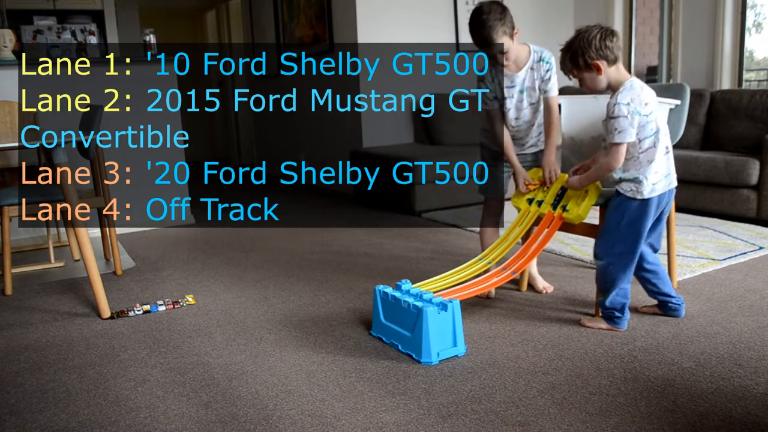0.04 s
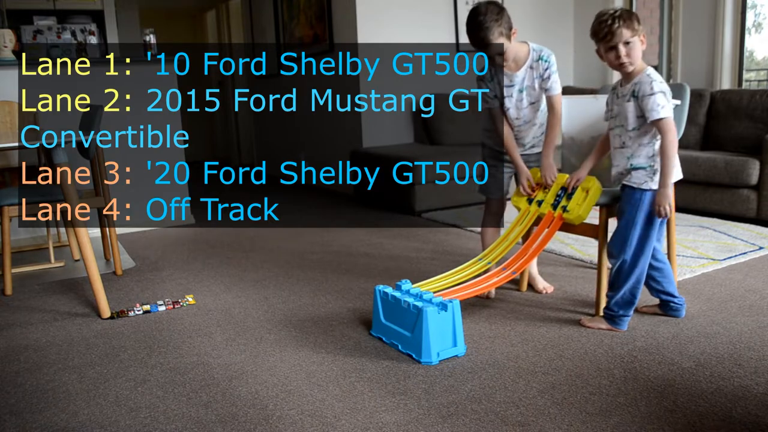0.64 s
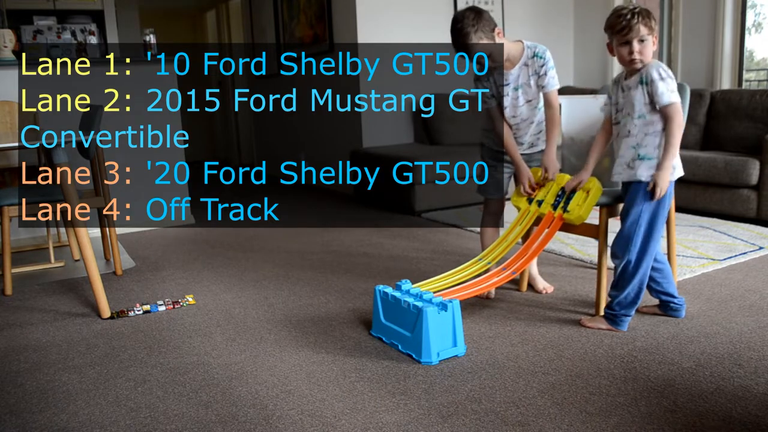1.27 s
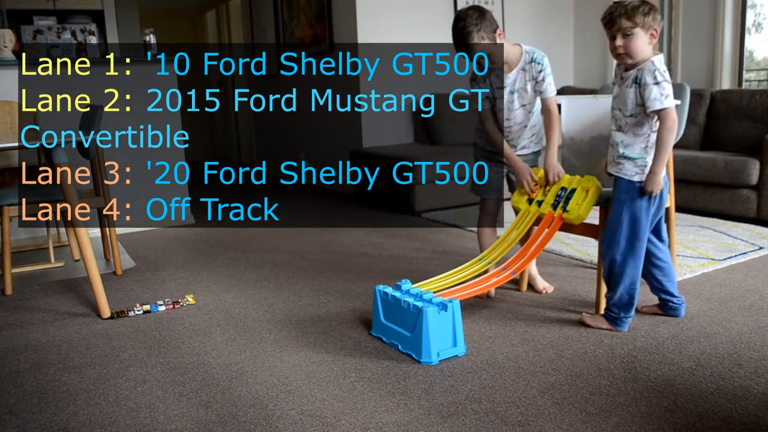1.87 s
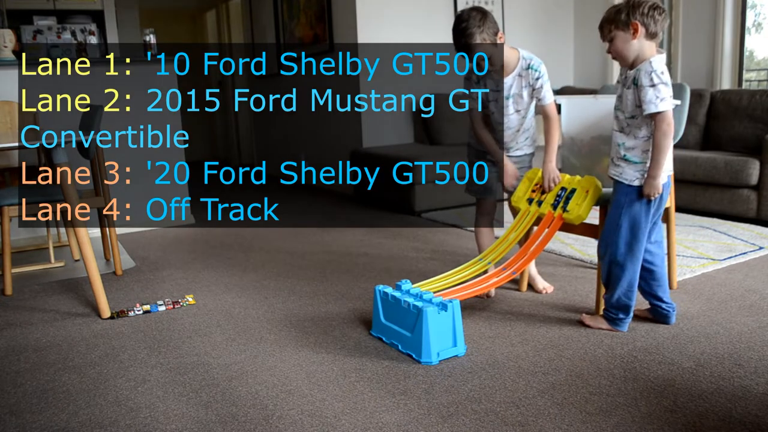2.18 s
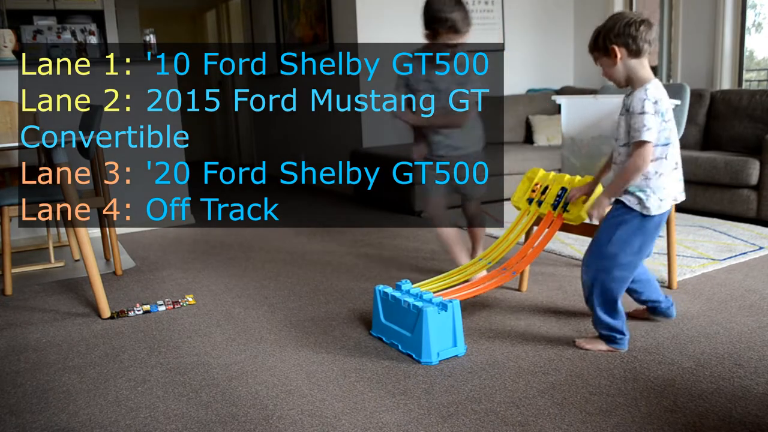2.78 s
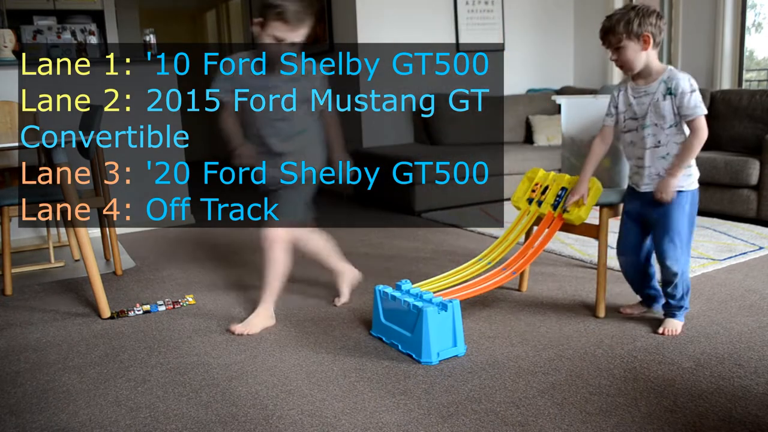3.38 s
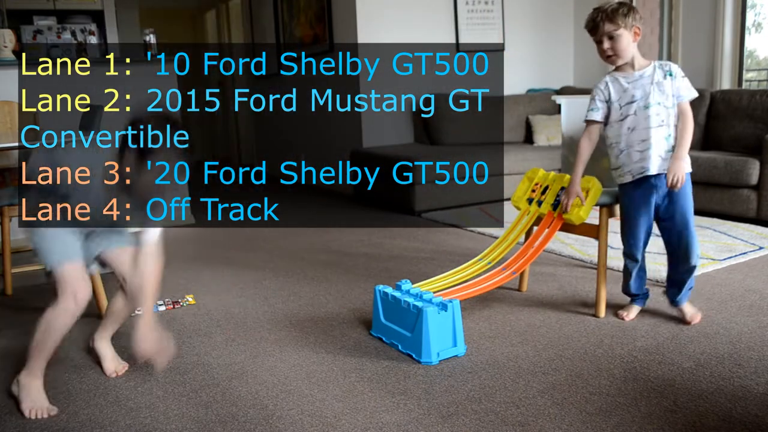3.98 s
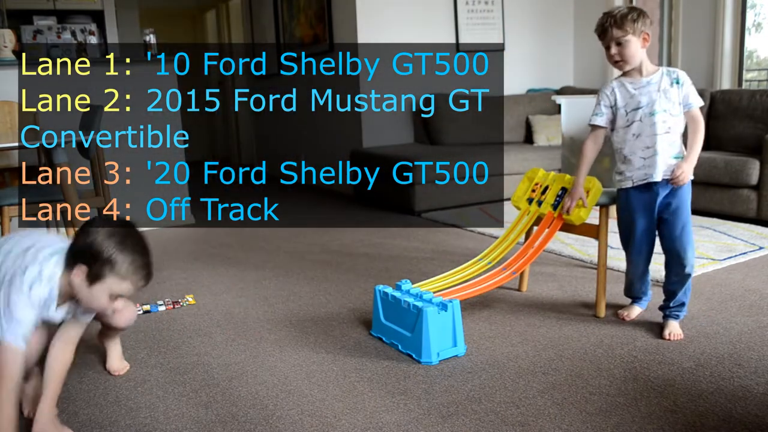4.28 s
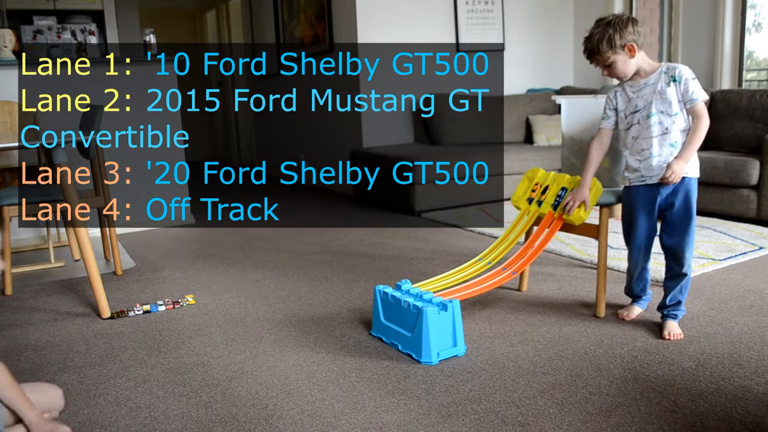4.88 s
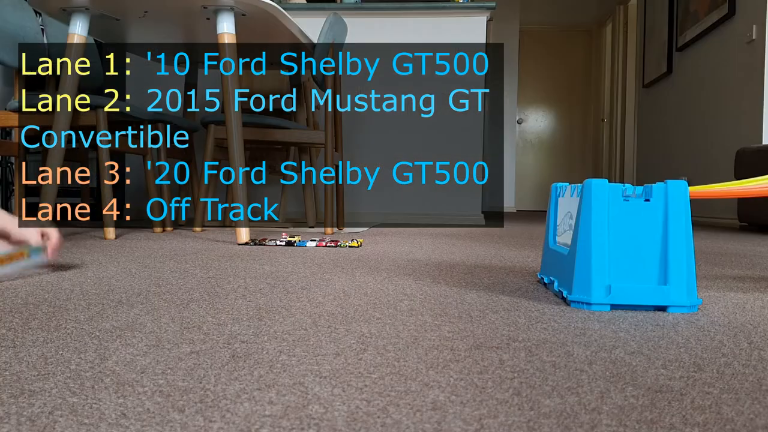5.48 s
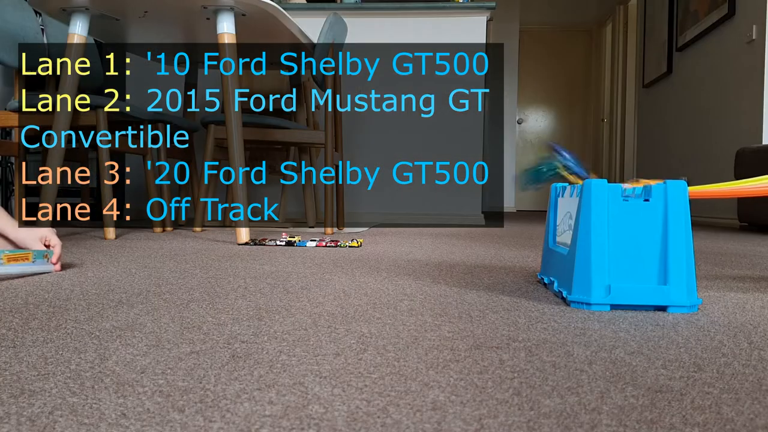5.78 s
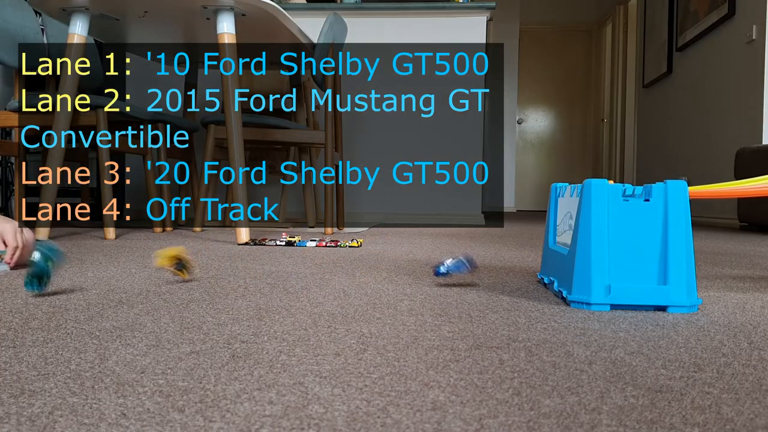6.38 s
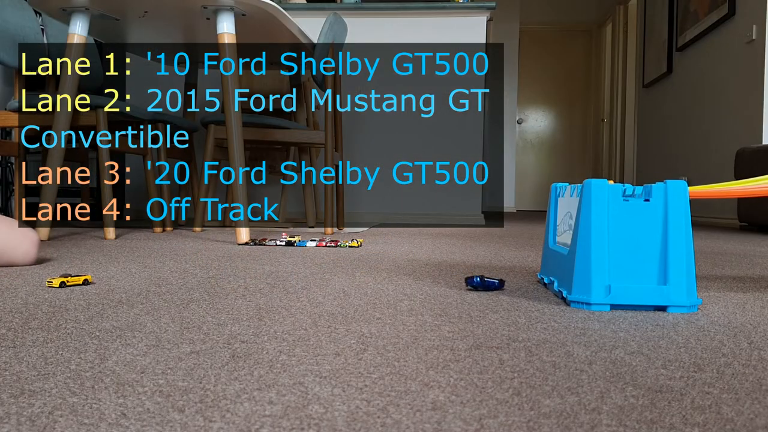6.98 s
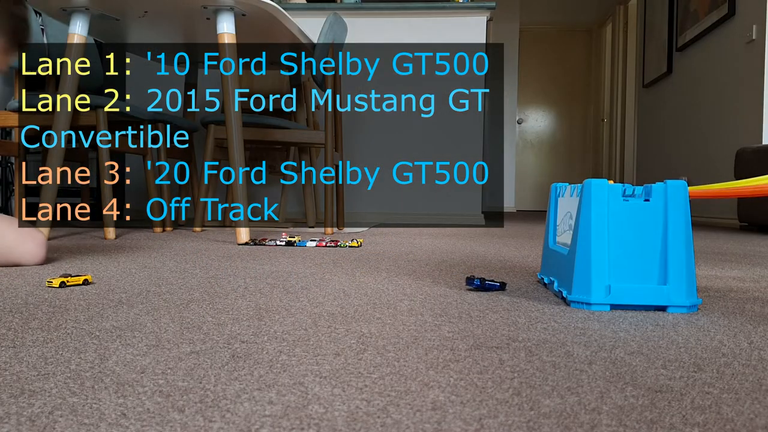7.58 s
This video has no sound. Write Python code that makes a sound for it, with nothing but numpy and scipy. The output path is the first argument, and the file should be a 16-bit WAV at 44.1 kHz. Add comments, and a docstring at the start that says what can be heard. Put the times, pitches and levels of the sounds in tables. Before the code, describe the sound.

Toy cars click into a plastic gate amid soft footsteps, then rattle down a track, clatter over a hollow stool and land on carpet.

```python
"""Die-cast cars race down a plastic toy track, drum over a hollow stool, clash, land on carpet and roll out.
First, in mono from across the room, children click the cars into the start gate and pad about, with
rustling clothes and a faint rumble of the floor. Then, in stereo from the floor near the track's end,
the gate scrapes and snaps open and the race runs: wheels rattle, plastic cracks, metal bodies ring.
A child shifts on the carpet afterwards. Each blow has a short room tail; soft air lies underneath."""
import sys
import numpy as np
from scipy import signal
from scipy.fft import rfft, irfft, next_fast_len
from scipy.io import wavfile
from scipy.ndimage import uniform_filter1d, map_coordinates

SR = 44100
rng = np.random.default_rng(int(sys.argv[2]) if len(sys.argv) > 2 else 0)


def master_out(mix):
    """Clip the mix to full scale and print it as 16-bit PCM to the path in sys.argv[1]."""
    frames = np.transpose(np.atleast_2d(mix))
    ceiling = np.clip(frames, -1, 1)
    pcm = np.round(ceiling * 32767).astype(np.int16)
    wavfile.write(sys.argv[1], SR, pcm)


N = 337188

# Modes of the stool with the lanes on it. Each row: frequency in Hz, level in dB, t60 in seconds.
STOOL_MODES = [(174, -5, .4), (205, -6, .25), (232, 0, .35), (265, -4, .2), (306, 0, .28), (335, -5, .2),
               (349, -3, .28), (429, 0, .3), (461, 1, .32), (512, -4, .22), (660, -6, .1), (750, -7, .12)]
# The hollow boom under wheels and landings. Each row: frequency in Hz, level in dB.
BOOM_SPECTRUM = [(59, -45.5), (100, -11.5), (146, -3), (227, 1.5), (340, -2.5), (371, -6.5), (445, -0.5),
                 (572, -15), (654, -9.5), (1000, -12.5), (1300, -49.5), (2200, -120)]


def rolling(hiss_db=4, rumble_db=-6.0, leave_s=6.2, whirr_hz=3450, at_stool_s=6.13, stool_boost_db=19):
    """Wheels rattle in the lanes and drum the stool, then whirr on over the carpet."""
    # The swell of the wheel noise. Each row: time in seconds, level in dB.
    roll_levels = [(5.17, -65), (5.232, -36.5), (5.342, -38), (5.378, -37.5), (5.73, -33.5), (6.002, -42.5),
                   (6.138, -50), (6.18, -66.5), (6.41, -57.5), (6.678, -56.5), (6.782, -53), (7.05, -75.5)]
    # Wheels on plastic, and on carpet. Each row: frequency in Hz, level in dB.
    lane_spectrum = [(290, -38), (500, -17), (553, -15), (792, -17.5), (851, -16.5), (941, -15.5),
                     (1090, -15), (1270, -8.5), (1720, -14.5), (2070, -5), (2690, -7.5), (3580, -2.5),
                     (5050, -10), (12500, -23.5), (15500, -28)]
    carpet_spectrum = [(290, -36), (500, -5), (638, -23.5), (815, -28), (1450, -22.5), (1650, -13),
                       (2650, -13), (4020, -7), (5130, -12), (12500, -20), (15500, -39.5)]
    t = np.arange(N) / SR
    on_track = np.clip((leave_s - t) / 0.45, 0, 1)
    rattle = grainy_noise(lane_spectrum, grain_db=1.5, grain_rate=500)
    # the wheels chatter on their axles around one pitch
    rattle = unit(filtered(rattle, lambda hz: amp(hump(hz, whirr_hz, height_db=2, octaves=0.2))))
    whirr = grainy_noise(carpet_spectrum, grain_db=4.5, grain_rate=200)
    wheels = np.sqrt(on_track) * rattle + np.sqrt(1 - on_track) * whirr
    modes_db = lambda hz: sum(hump(hz, mode[0], height_db=2.5, octaves=0.15) for mode in STOOL_MODES)
    rumble = unit(filtered(even_noise(BOOM_SPECTRUM), lambda hz: amp(modes_db(hz))))
    drum_db = rumble_db + stool_boost_db * np.exp(-((t - at_stool_s) / 0.27) ** 2)
    envelope = amp(np.interp(t, *np.transpose(roll_levels), left=-120, right=-120))
    return envelope * (amp(hiss_db) * wheels + amp(drum_db) * rumble)


def collisions():
    """Cars knock against the lanes and each other, and thump the stool."""
    # Hard contacts. Each row: start in seconds, level in dB, pitch in Hz, brightness in dB.
    contacts = [(5.667, -26, 1900, -9.5), (5.714, -25, 2500, -2), (5.73, -19, 2380, -2.5),
                (5.749, -15.5, 2680, 2.5), (5.768, -17, 1790, -3), (5.782, -18, 920, 1.5),
                (5.886, -22, 1900, -21), (5.948, -22.5, 810, -9.5), (6.072, -20, 2900, 2.5),
                (6.354, -40, 3280, -15), (6.425, -28.5, 3350, -6), (6.506, -46.5, 2940, -4.5),
                (6.68, -37.5, 4040, -10), (6.766, -44.5, 3700, -2), (6.804, -42, 3710, -5),
                (6.89, -46, 3600, -0.5)]
    # The heaviest blows on the stool. Each row: start in seconds, level in dB, pitch in Hz.
    blows = [(5.714, -21.5, 272), (5.741, -15.5, 312), (5.768, -13.5, 483), (5.781, -12, 437),
             (5.885, -18.5, 400), (5.924, -21.5, 265), (6.037, -23, 494)]
    thuds, cracks = jolts()
    return clacks(contacts + cracks, lows_db=0.5, room_db=-3) + stool_bumps(blows + thuds)


def jolts(count=8, gap_s=0.021, scatter_s=0.0015, scatter_db=0.5, scatter_octaves=0.34, crack_hz=1730):
    """Cars jolt over the lane ends in quick, nearly even runs: rows for their thuds and their cracks."""
    # Each row: start in seconds, thud level in dB, thud pitch in Hz, crack level and brightness in dB.
    crossings = [(5.668, -23, 290.7, -29, -2), (5.965, -24.5, 336, -35.5, -0.5)]
    thuds, cracks = [], []
    for start, db, hz, crack_db, bright_db in crossings:
        for k, (late, hard, high) in enumerate(rng.standard_normal((count, 3))):
            s = start + k * gap_s + scatter_s * late
            thuds.append((s, db + scatter_db * hard, hz * 2 ** (scatter_octaves * high)))
            cracks.append((s, crack_db + scatter_db * hard, crack_hz, bright_db))
    return thuds, cracks


def clacks(rows, lows_db, room_db, gain_db=-1, metal_db=-5, metal_from_hz=3200, metal_span_hz=850):
    """Hard contacts crack: low ones are plastic, high ones set the metal car bodies ringing."""
    # Modes of a car's body. Each row: frequency in Hz, level in dB, t60 in seconds.
    car_modes = [(4020, 11, 0.14), (4170, -3.5, 0.32), (3830, -4.5, 0.38), (5310, -15, .2),
                 (6650, -18.5, .15)]
    # The colour of a crack. Each row: frequency in Hz, level in dB.
    spectrum = [(350, -16.5), (600, 4.5), (866, -2), (1230, -1), (1470, -8.5), (1810, -5.5), (2010, -9.5),
                (3520, -5), (4940, -7.5), (6950, -9), (9500, -13.5), (11300, -13.5), (15500, -24)]
    out = np.zeros((2, N))
    for s, db, pitch_hz, bright_db in rows:
        hardness = [(600, lows_db), (1100, 0.0017), (3500, 0.0017), (7000, bright_db + 8.5)]
        note = lambda hz: hump(hz, pitch_hz, height_db=10, octaves=0.63)
        colour = lambda hz: along(spectrum, hz) + along(hardness, hz) + note(hz)
        crack = burst(colour, t60=0.028, chatter_db=-16, chatter_t60=0.26)
        metal = amp(metal_db) * np.clip((pitch_hz - metal_from_hz) / metal_span_hz, 0, 1) * ring(car_modes)
        add_blow(out, s, amp(db + gain_db) * panned(crack + metal, s), room_db)
    return out


def stool_bumps(rows, gain_db=-1.0, ring_db=-12, room_db=-9):
    """Each bump of the lanes pushes the hollow stool, which booms on."""
    out = np.zeros((2, N))
    for s, db, hz in rows:
        bump = thud(hz, cycles=4.4) + amp(ring_db) * ring(STOOL_MODES)
        add_blow(out, s, amp(db + gain_db) * panned(bump, s), room_db)
    return out


def landings(boom_db=-19, room_db=-8):
    """A car hits the carpet with one short pat and a faint low boom."""
    # Each row: start in seconds, level in dB, pitch in Hz. The last is the soft thud of a child shifting.
    pats = [(5.947, -12.5, 464), (6.354, -32.5, 363), (6.419, -28.5, 427), (6.514, -31.5, 340),
            (6.678, -37.5, 238), (7.587, -43, 260)]
    out = np.zeros((2, N))
    for s, db, pitch_hz in pats:
        boom = burst(lambda hz: along(BOOM_SPECTRUM, hz), t60=0.14, chatter_db=-14.5, chatter_t60=0.42)
        landing = thud(pitch_hz, cycles=2.12) + amp(boom_db) * boom
        add_blow(out, s, amp(db) * panned(landing, s), room_db)
    return out


def gate_opening():
    """The plastic start gate scrapes and snaps open, far from the stool."""
    # The scrape. Each row: peak time in seconds, length in seconds, level in dB.
    slide = [(5.235, 0.15, -30.5)]
    # Each row: start in seconds, level in dB, pitch in Hz, brightness in dB.
    snaps = [(5.208, -18, 1300, -23), (5.215, -19.5, 1850, -10), (5.243, -18.5, 3220, -9)]
    spectrum = [(300, -28), (700, -9.5), (1200, 1.5), (2000, -4), (3500, -2), (6000, -21), (15000, -35)]
    scrape = swells(slide) * grainy_noise(spectrum, grain_db=3.0, grain_rate=400)
    return scrape + clacks(snaps, lows_db=-9.5, room_db=-0.5)


def gate_loading(touch_s=0.025, settle_s=0.055, cavity_db=4, room_db=-2):
    """Cars touch the plastic gate softly, click in and settle; each spot has its own hollow note."""
    # Each row: start in seconds, level in dB, pitch in Hz, brightness in dB.
    clicks = [(0.002, -26.5, 574, 4), (0.156, -36, 1300, 3.5), (0.315, -29, 1570, 6.5),
              (0.333, -32, 1860, 4.5), (0.453, -30.5, 1090, 5), (0.488, -39, 3870, 4),
              (0.514, -39, 1600, 6), (0.884, -45, 1310, 7), (0.924, -44, 1560, 4), (1.081, -34, 1160, -6.5),
              (1.109, -37.5, 1030, -8), (1.488, -41, 1090, -1.5), (1.878, -35.5, 1720, 8),
              (1.964, -27.5, 1160, 3), (2.205, -48, 1190, -9), (2.411, -43, 2480, 11.5),
              (2.482, -37, 1910, 5.5)]
    # The colour of the gate. Each row: frequency in Hz, level in dB.
    spectrum = [(71, -80), (120, -12.5), (325, 0), (459, 0), (519, -7), (764, -1.5), (1060, -4), (1270, -5),
                (1560, -3.5), (3440, -11.5), (4390, -15), (5490, -22), (12900, -33), (15500, -62)]
    touches = [(s - touch_s * (.5 + rng.random()), db - 16, hz, 9) for s, db, hz, _ in clicks]
    settles = [(s + settle_s * (.5 + rng.random()), db - 15.5, hz, bright) for s, db, hz, bright in clicks]
    out = np.zeros((2, N))
    for s, db, pitch_hz, bright_db in touches + clicks + settles:
        treble = [(2800, 0), (7000, bright_db)]
        body = lambda hz: hump(hz, pitch_hz, height_db=14, octaves=1.63)
        cavity = lambda hz: hump(hz, pitch_hz, cavity_db, octaves=0.062)
        colour = lambda hz: along(spectrum, hz) + along(treble, hz) + body(hz) + cavity(hz)
        click = burst(colour, t60=0.055, chatter_db=-32, chatter_t60=0.077)
        add_blow(out, s, amp(db) * click, room_db)
    return out


def steps(pat_hz=526, scuff_db=-7, room_db=1):
    """Feet, knees and hands pat and scuff the carpet; the heavier steps shake the floor."""
    # Each row: start in seconds, level in dB, bass weight in dB.
    footfalls = [(2.596, -40.5, -29), (3.013, -43.5, -6), (3.295, -41, -13), (3.369, -39, -7),
                 (3.527, -47.5, -27), (3.847, -38, -7), (3.928, -34.5, -10), (4.294, -41.5, -9),
                 (4.36, -42, -9), (4.715, -38.5, -26), (5.044, -31.5, -14)]
    # The colour of a scuff. Each row: frequency in Hz, level in dB.
    spectrum = [(29, -39.5), (50, -1), (85, -0.5), (251, -8.5), (427, -3), (754, -10.5), (957, -10.5),
                (1070, -13.5), (1920, -22.5), (4000, -40), (5200, -50), (8800, -120)]
    out = np.zeros((2, N))
    for s, db, weight_db in footfalls:
        heft = [(150, weight_db + 7.0), (350, 0)]
        colour = lambda hz: along(spectrum, hz) + along(heft, hz)
        scuff = burst(colour, t60=0.082, chatter_db=-13, chatter_t60=0.077)
        add_blow(out, s, amp(db) * (thud(pat_hz, cycles=1.87) + amp(scuff_db) * scuff), room_db)
    return out


def clothes(gain_db=-2):
    """Fabric swishes once for each movement."""
    # Each row: peak time in seconds, length in seconds, level in dB.
    movements = [(0.3, 0.58, -47.5), (2.65, 0.9, -56), (3.19, 0.51, -48), (3.31, 0.14, -45.5),
                 (3.58, 0.33, -46), (4.09, 0.45, -54), (4.46, 0.5, -49.5), (4.72, 0.3, -42.5),
                 (4.925, 0.21, -49.5)]
    # The colour of the rustle. Each row: frequency in Hz, level in dB.
    spectrum = [(88, -44), (150, -14.5), (453, -7.5), (500, -10.5), (561, -3), (618, -4.5), (930, -3.5),
                (1170, -8), (1540, -4.5), (15500, -45)]
    return amp(gain_db) * swells(movements) * grainy_noise(spectrum, grain_db=3.5, grain_rate=45)


def carpet_shuffle():
    """A child shifts after the race, brushing the carpet."""
    # Each row: peak time in seconds, length in seconds, level in dB.
    movements = [(7.35, 0.197, -55.5), (7.56, 0.28, -59.5)]
    spectrum = [(150, 1.0), (450, 4.0), (1600, -3.0), (3000, -11), (9000, -16), (15000, -32)]
    return swells(movements) * grainy_noise(spectrum, grain_db=1.5, grain_rate=74)


def floor_rumble():
    """The floor rumbles as a child shifts weight."""
    # Each row: peak time in seconds, length in seconds, level in dB.
    sways = [(2.36, 0.27, -55), (4.9, 0.6, -59)]
    # The colour of the rumble. Each row: frequency in Hz, level in dB.
    spectrum = [(15, -25), (40, -4.5), (75, 1.5), (110, -11), (250, -44), (1000, -90)]
    return swells(sways) * even_noise(spectrum)


def room_air(near):
    """The steady hush of the room, by the track's end or from afar."""
    # Each row: frequency in Hz, level in dB.
    near_spectrum = [(25, -11), (95, -1.5), (250, -24.5), (500, -34.5), (1500, -30.5), (3000, -38),
                     (5000, -30.5), (10000, -49.5), (15500, -47)]
    far_spectrum = [(15, -30), (25, -5), (43, -3.5), (91, -6), (188, -16.5), (253, -13.5), (848, -14),
                    (970, -7), (1110, -15.5), (2700, -22.5), (5730, -39), (14300, -47.5), (15500, -43)]
    return amp(-58) * even_noise(near_spectrum) if near else amp(-59) * even_noise(far_spectrum)


def burst(colour_db, t60, chatter_db, chatter_t60):
    """A coloured contact: a sharp crack, then the chatter of loose parts."""
    t = blow_time()
    decay = amp(-60 * t / t60) + amp(chatter_db - 60 * t / chatter_t60)
    noise = rng.standard_normal(len(t)) * decay * (1 - np.exp(-t / 0.0013))
    return peaked(minimum_phase(noise, colour_db))


def ring(modes):
    """Decaying modes, struck at new strengths and phases each time."""
    t = blow_time()
    tones = sum(amp(db + rng.normal(0, 2) - 60 * t / t60) * np.sin(2 * np.pi * (hz * t + rng.random()))
                for hz, db, t60 in modes)
    return peaked(tones * (1 - np.exp(-t / .001)))


def thud(hz, cycles):
    """A dull blow that dies within a few cycles."""
    turns = blow_time() * max(hz, 100)
    return peaked(np.sin(2 * np.pi * turns) * turns * amp(-60 * turns / cycles))


def grainy_noise(spectrum, grain_db, grain_rate):
    """Stereo noise of rms 1 made of brief contacts of uneven size, grain_rate a second."""
    knots = rng.standard_normal(int(N * grain_rate / SR) + 4)
    sizes = amp(grain_db * map_coordinates(knots, [np.arange(N) * grain_rate / SR], order=1))
    grains = rng.standard_normal((2, N)) * sizes
    return unit(filtered(diffuse(grains), lambda hz: amp(along(spectrum, hz))))


def even_noise(spectrum):
    """Smooth stereo noise of rms 1."""
    return unit(filtered(diffuse(rng.standard_normal((2, N))), lambda hz: amp(along(spectrum, hz))))


def swells(rows, rise_share=0.45, depth_db=13):
    """Gain per sample of movements that each swell and fade."""
    t = np.arange(N) / SR
    power = np.zeros(N)
    for s, length, db in rows:
        from_peak = np.maximum((s - t) / rise_share, (t - s) / (1 - rise_share)) / length
        power += amp(db - depth_db * from_peak) ** 2
    return np.sqrt(power)


def panned(blow, s, lag_s=0.00012, shade_db=1.0):
    """A car on the left reaches the left channel sooner and louder."""
    # The sounding car. Each row: time in seconds, side from -1 (right) to 1 (left).
    bearings = [(5.2, -0.14), (6.0, -0.16), (6.35, 0.84), (6.42, 0.15), (6.51, 0.71), (6.9, 0.93)]
    side = np.interp(s, *np.transpose(bearings)) * np.array([[1], [-1]])
    return filtered(blow, lambda hz: amp(shade_db * side) * np.exp(2j * np.pi * hz * lag_s * side))


def add_blow(out, s, blow, room_db):
    """Mix a blow in at time s, with its own answer from the room."""
    # The room's decay. Each row: frequency in Hz, t60 in seconds.
    room_t60 = [(150, 0.49), (500, 0.26), (1400, 0.39), (3700, 0.42), (10000, 0.27)]
    hz, t, bands = signal.stft(rng.standard_normal((2, SR // 2)), SR, nperseg=256)
    bands = bands * amp(-60 * t / along(room_t60, hz)[:, None]) * (1 - np.exp(-t / 0.0017))
    tail = diffuse(signal.istft(bands, SR, nperseg=256)[1])
    tail /= np.linalg.norm(tail[0])
    wet = signal.fftconvolve(np.atleast_2d(blow)[:1], tail, axes=1)[:, :blow.shape[-1]]
    start = max(round(s * SR), 0)
    out[:, start:start + wet.shape[1]] += (blow + amp(room_db) * wet)[:, :N - start]


def diffuse(pair):
    """Two unrelated signals become a diffuse field at two close points: alike in the bass only."""
    # Each row: frequency in Hz, left-right correlation.
    likeness = [(150, 0.95), (400, 0.68), (950, 0.3), (2400, 0.14), (6000, 0.1)]
    turn = lambda hz: np.arccos(along(likeness, hz)) / 2
    mid, side = filtered(pair, lambda hz: np.array([np.cos(turn(hz)), np.sin(turn(hz))]))
    return np.array([mid + side, mid - side])


def minimum_phase(x, colour_db, size=2048):
    """Colour x so that nothing sounds before the blow."""
    cepstrum = irfft(np.log(amp(np.maximum(colour_db(np.fft.rfftfreq(size, 1 / SR)), -100))))
    cepstrum[1:size // 2] *= 2
    cepstrum[size // 2 + 1:] = 0
    return signal.fftconvolve(x, irfft(np.exp(rfft(cepstrum))))[:len(x)]


def filtered(x, response):
    """Apply a gain that depends on frequency."""
    n = x.shape[-1]
    padded = next_fast_len(n + 4096)
    return irfft(rfft(x, padded) * response(np.fft.rfftfreq(padded, 1 / SR)), padded)[..., :n]


def hump(hz, centre_hz, height_db, octaves):
    """A bell-shaped resonance, in dB."""
    return height_db * np.exp(-np.log2((hz + 1) / centre_hz) ** 2 / octaves ** 2)


def along(points, hz):
    """Read (Hz, value) points on a log frequency axis."""
    freqs, values = np.transpose(points)
    return np.interp(np.log(hz + 1), np.log(freqs + 1), values)


def blow_time():
    """The half-second time axis of one blow."""
    return np.arange(SR // 2) / SR


def peaked(x):
    """Scale a blow so that its loudest 3 ms have rms 1."""
    return x / np.sqrt(uniform_filter1d(x * x, 128).max() + 1e-20)


def unit(x):
    """Scale to rms 1."""
    return x / np.sqrt(np.mean(x ** 2) + 1e-20)


def amp(db):
    """Decibels to gain."""
    return 10 ** (np.asarray(db) / 20)


def scene(cut_s=5.166, left_db=0.9):
    """The distant mono loading cuts to the close stereo race, whose left channel is a little louder throughout."""
    far = gate_loading() + steps() + clothes() + floor_rumble() + room_air(near=False)
    near = gate_opening() + rolling() + collisions() + landings() + carpet_shuffle() + room_air(near=True)
    return np.where(np.arange(N) / SR < cut_s, far[0], near * amp([[left_db], [-left_db]]))


def record(dry):
    """Cut the treble above 15.9 kHz."""
    return filtered(dry, lambda hz: hz < 15900)


dry = scene()
out = record(dry)
master_out(out)
```